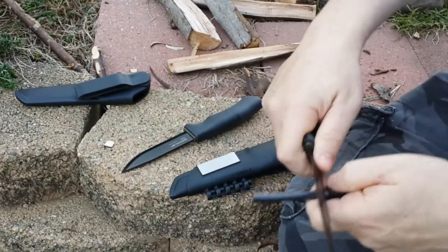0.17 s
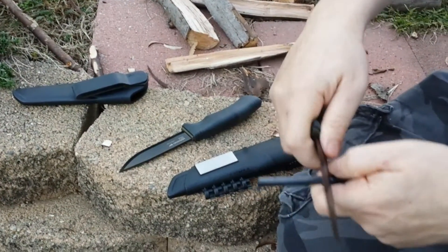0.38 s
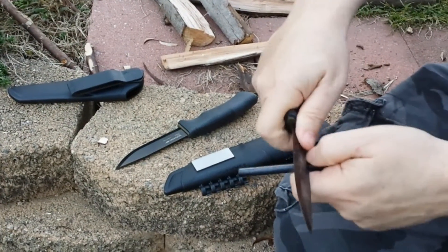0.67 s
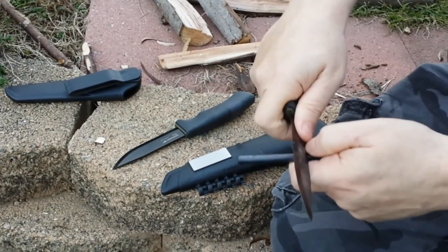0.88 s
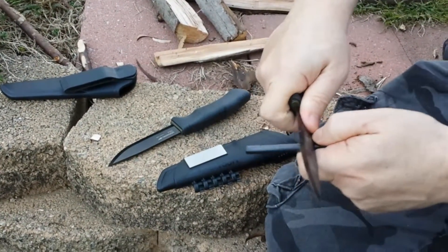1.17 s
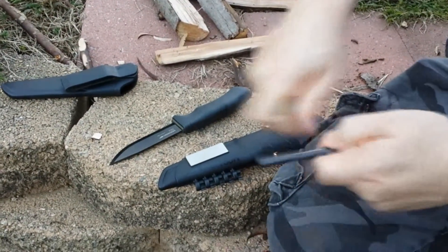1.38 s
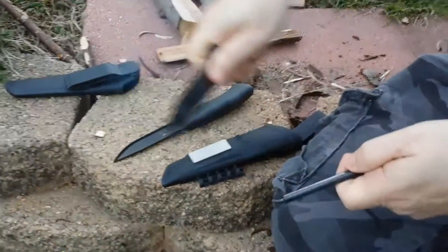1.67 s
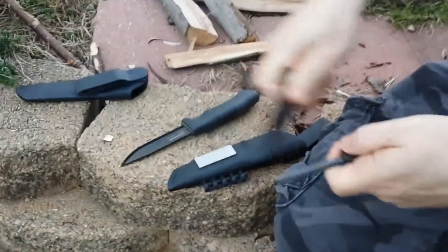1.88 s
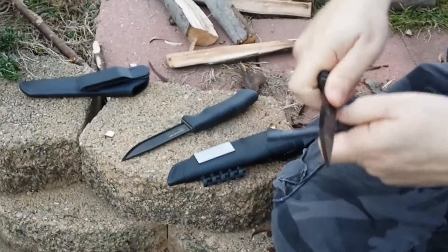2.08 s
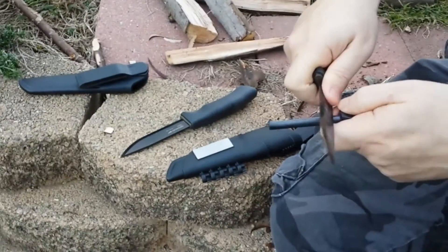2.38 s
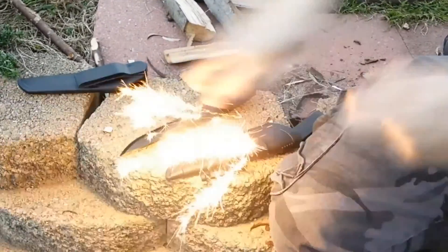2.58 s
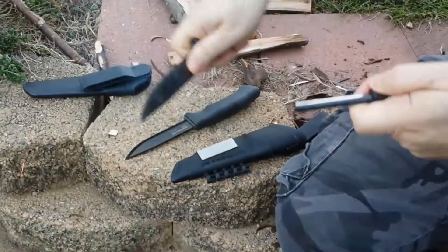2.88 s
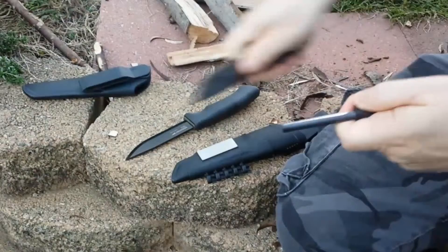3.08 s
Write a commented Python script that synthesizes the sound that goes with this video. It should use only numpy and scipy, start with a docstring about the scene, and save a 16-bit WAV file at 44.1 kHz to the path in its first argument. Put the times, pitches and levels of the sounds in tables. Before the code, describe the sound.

Close outdoors, soft handling creaks and a dull knock, then a harsh rod scrape with a sizzling shower of sparks, small knocks and pops, and a second scrape; crickets, insect buzz, thin bird notes, distant traffic.

```python
"""Outdoors, close to a stereo camera: a knife spine is driven twice along a fire steel.
Stick-slip clicks ring blade and rod as a rasp, with short squeals, and the spine snaps off the tip.
Random clicks make the shower of burning shavings, which dies in single pops made of filtered noise.
Grip creaks (noise bursts) and soft knocks (decaying sines) come in between, over sine-tone crickets,
a katydid buzz of dense clicks, thin bird notes, distant traffic and hiss of coloured noise."""
import sys
import numpy as np
from scipy import signal
from scipy.fft import rfft, irfft
from scipy.io import wavfile
from scipy.ndimage import uniform_filter1d

SR = 44100
rng = np.random.default_rng(int(sys.argv[2]) if len(sys.argv) > 2 else 0)


def store_wav(level_fs):
    """Save 16-bit WAV to argv[1]."""
    pcm = np.round(np.clip(np.atleast_2d(level_fs), -1, 1) * 32767)
    wavfile.write(sys.argv[1], SR, pcm.T.astype(np.int16))


def makeup_ratio(level_db):
    """Linear amplitude ratio for a level in decibels (20 dB per factor of ten)."""
    decades = np.asarray(level_db, float) / 20
    return 10 ** decades


N = 143325
T = np.arange(N) / SR


def level(x, db):
    """Scale to an rms level."""
    return x * makeup_ratio(db) / np.sqrt(np.mean(x ** 2))


def colour(x, table):
    """Causal minimum-phase filter with the gain of a (frequency [Hz], level [dB]) table."""
    size = 4096
    hz, db = np.array(table, float).T
    bins_hz = np.maximum(np.arange(size // 2 + 1) * SR / size, 1)
    log_gain = np.interp(np.log(bins_hz), np.log(hz), db) * np.log(10) / 20
    cepstrum = irfft(log_gain)
    # fold the cepstrum forward in time, which makes the filter causal
    cepstrum[1:size // 2] *= 2
    cepstrum[size // 2 + 1:] = 0
    impulse = irfft(np.exp(rfft(cepstrum)))
    if x.ndim > 1:
        impulse = np.atleast_2d(impulse)
    return signal.fftconvolve(x, impulse, axes=-1)[..., :N]


def ring(x, hz, width_hz):
    """One resonance."""
    return signal.lfilter(*signal.iirpeak(min(hz, .45 * SR), hz / width_hz, SR), x)


def walk(rate):
    """Smooth random wander with spread 1, drawing a new value rate times a second."""
    hold = max(int(SR / rate), 2)
    steps = np.repeat(rng.standard_normal(N // hold + 1), hold)
    wander = uniform_filter1d(steps, hold)[:N]
    return wander / wander.std()


def grains(rate, spread_db):
    """Random clicks, many small and a few large; rms 1."""
    chance, sign, size = rng.random((3, N))
    clicks = (chance < rate / SR) * np.sign(sign - .5) * makeup_ratio(-spread_db * np.log(size + .003))
    return level(clicks, 0)


def curve(rows, db):
    """Gain over the times of a table, silent outside it."""
    return makeup_ratio(np.interp(T, np.array(rows)[:, 0], db, left=-200, right=-200))


def bump(t0, length):
    """Rounded swell."""
    return np.sin(np.pi * np.clip((T - t0) / length, 0, 1)) ** .35


def ports(x, lag_s):
    """Two spaced ports: a lag, and each its own short treble scatter off stone and hands."""
    echo_db, echo_t60_s, echo_from_hz = -2, .012, 1300
    n = int(.04 * SR)
    tail = rng.standard_normal((2, n)) * np.exp(-np.log(1000) * np.arange(n) / SR / echo_t60_s)
    tail = signal.lfilter(*signal.butter(2, echo_from_hz, "high", fs=SR), tail)
    tail *= makeup_ratio(echo_db) / np.sqrt((tail ** 2).sum(axis=1, keepdims=True))
    tail[:, 0] = 1  # direct sound
    left = np.roll(x, int(round(lag_s * SR)))
    return signal.fftconvolve(np.array([left, x]), tail, axes=1)[:, :N]


def blip(t0, db, hz, width_hz, length_s):
    """A noise burst fading 20 dB over its length, twice through one resonance; start index and wave."""
    u = np.arange(1200) / SR
    push = rng.standard_normal(len(u)) * np.exp(-2.3 * u / max(length_s, .0003))
    y = ring(ring(push, hz, width_hz), hz, width_hz)
    loudest_power = np.max(uniform_filter1d(y ** 2, size=30))
    return int(t0 * SR), y * makeup_ratio(db) / np.sqrt(2 * loudest_power)


def add(track, i, y):
    """Mix a wave into a track."""
    track[..., i:i + y.shape[-1]] += y[..., :N - i]


# background hiss colour, its top cut away steeply: (frequency [Hz], level [dB])
HISS_COLOUR = [(100, -0.5), (700, 0.5), (2000, -2), (3200, -2), (6000, 1.5), (10000, -5), (12000, -5.5),
               (14000, -25.5), (15500, -50)]


def background_hiss():
    """Independent coloured noise in each channel."""
    return level(colour(rng.standard_normal((2, N)), HISS_COLOUR), -67.5)


# distant traffic spectrum: (frequency [Hz], level [dB])
TRAFFIC_COLOUR = [(12, -68.5), (20, -28.5), (32, -15.5), (47, -6.5), (97, -0.5), (125, -5.5), (208, -11),
                  (330, -18), (900, -35), (1170, -53), (1980, -120)]


def traffic():
    """Low rumble of distant traffic: a shared noise plus a side noise in opposite polarity."""
    mid, side = colour(rng.standard_normal((2, N)), TRAFFIC_COLOUR)
    side = colour(side, [(50, -16.5), (150, -16.5), (300, -7), (800, -5.5)])
    rumble = mid + side * np.array([[1], [-1]])
    balance_db = np.array([[.6], [-.6]])  # left, right
    return level(rumble * makeup_ratio(0.8 * walk(3.75) + balance_db), -60.5)


# cricket chorus spectrum: (frequency [Hz], level per Hz [dB])
CHORUS_COLOUR = [(3300, -35.5), (3650, -3.5), (3950, 2.5), (4300, -3.5), (4800, -6.5), (5150, -19)]
# near crickets: (start [s], length [s], frequency [Hz], pulse rate [1/s], level [dB])
CHIRPS = [(-.05, .48, 4260, 38, -67.5), (.59, .33, 4470, 26, -64.5), (1.76, .45, 3950, 30, -67),
          (2.95, .35, 4250, 35, -69.5)]


def crickets():
    """A flickering noise-band chorus and a few nearer sine chirps with pulsing level."""
    chorus_db, lag_turns = -64.5, .2
    chorus = level(colour(rng.standard_normal((2, N)), CHORUS_COLOUR), chorus_db)
    out = chorus * makeup_ratio(0.5 * walk(1.1) + 1.1 * walk(38))
    for t0, s, hz, rate, db in CHIRPS:
        beat = .75 + .25 * np.sin(2 * np.pi * rate * T)
        gain = makeup_ratio(db + 1.5 * walk(25))
        turns = np.cumsum(hz + 9 * walk(60)) / SR + np.array([[0], [lag_turns]])
        out += gain * np.sin(2 * np.pi * turns) * beat * bump(t0, s) ** 0.44
    return out


# creaks of the grip: (time [s], level before the common trim [dB], frequency [Hz])
CREAKS = [(0.2399, -54, 1750), (0.2574, -58, 1580), (0.275, -50, 1830), (0.2848, -51, 1760),
          (0.3132, -52, 1840), (0.3326, -50, 1840), (0.347, -48, 2090), (0.374, -49, 2270),
          (0.4013, -51, 2000), (0.4384, -47, 2240), (0.4677, -48, 2060), (0.498, -48, 2020),
          (0.5357, -52, 1900), (0.5636, -53, 1850), (0.6549, -49.5, 2140), (0.933, -47, 1600),
          (0.9765, -50.5, 1600), (1.0064, -44.5, 2380), (1.0184, -48.5, 1610), (1.0363, -48, 1860),
          (1.054, -46.5, 1940), (1.1099, -45, 1880), (1.6629, -38.5, 1690)]


def grip_creaks():
    """Short broad bursts as the grip creaks."""
    trim_db, relative_width, length_s = -9, .75, .003
    out = np.zeros(N)
    for t0, db, hz in CREAKS:
        add(out, *blip(t0, db + trim_db, hz, relative_width * hz, length_s))
    return out


# thin bird notes: (start [s], length [s], start frequency [Hz], end frequency [Hz], level [dB])
NOTES = [(0.458, .06, 7600, 7550, -72), (0.689, 0.024, 7450, 7700, -60), (1.57, 0.063, 7750, 7700, -56),
         (2.117, 0.047, 7370, 7250, -61), (3.0, .08, 7450, 7550, -68), (3.134, .05, 7400, 7320, -70.5)]


def bird_notes():
    """Gliding sine notes, unsteady in pitch and level, with a random phase in each channel."""
    out = np.zeros((2, N))
    for t0, s, hz, end_hz, db in NOTES:
        f = np.interp(T, [t0, t0 + s], [hz, end_hz]) + 40 * walk(76)
        turn = 2 * np.pi * (np.cumsum(f) / SR + rng.random((2, 1)))
        out += makeup_ratio(db + 4.2 * walk(68.9)) * np.sin(turn) * bump(t0, s)
    return out


# soft knocks of hand or handle: (time [s], level [dB], frequency [Hz], 60 dB decay [s], rise [s])
KNOCKS = [(0.6863, -36, 234, 0.075, 0.0044), (1.7045, -37.5, 366, 0.036, 0.0012),
          (1.7045, -41, 663, 0.022, 0.00051), (1.853, -34, 202, 0.015, 0.00068),
          (1.894, -44, 393, 0.0042, 0.0002), (2.44, -42.5, 830, 0.045, 0.0012)]


def knocks():
    """Decaying sines with a softened onset."""
    out = np.zeros(N)
    for t0, db, hz, t60, rise in KNOCKS:
        u = np.arange(int(t60 * SR)) / SR
        decay = np.exp(-np.log(1000) * u / t60)
        onset = 1 - np.exp(-(u / max(rise, 1e-4)) ** 2)
        add(out, int(t0 * SR), -makeup_ratio(db) * np.sin(2 * np.pi * hz * u) * decay * onset)
    return out


# late pops and small ticks: (time [s], level [dB], frequency [Hz], length [s], left minus right [dB])
POPS = [(0.933, -48.5, 6000, .002, -9), (1.112, -45, 6040, .006, 1), (1.510, -31.5, 9100, 0.0046, -14),
        (1.671, -38, 8300, .001, -12), (1.672, -28, 6200, 0.00089, -1.5), (1.697, -44.5, 6000, .003, 9),
        (2.076, -43, 6300, 0.0033, -0.5), (2.586, -32.5, 9000, .003, -14), (2.5935, -25.5, 6260, .001, -15),
        (2.598, -30, 6860, .002, -12.5), (2.656, -52.5, 7960, .002, -13), (2.689, -35.5, 6800, 0.011, 0),
        (2.696, -31.5, 8100, 0.0095, -11), (2.731, -45, 7900, .008, -8.5), (2.745, -45, 7000, .006, -9),
        (2.897, -54, 7540, 0.015, -7), (3.157, -53, 14030, 0.0018, -10)]


def single_pops():
    """Single bursts of resonant noise, drawn afresh for each channel and placed by level."""
    relative_width = 0.64
    out = np.zeros((2, N))
    for t0, db, hz, s, pan_db in POPS:
        for track, half in zip(out, (.5, -.5)):
            add(track, *blip(t0, db + pan_db * half, hz, relative_width * hz, s))
    return out


# katydid buzz: (start [s], length [s], level [dB])
BUZZES = [(1.035, 0.12, -56), (1.133, 0.13, -56.5), (1.505, 0.17, -53), (1.636, 0.15, -52),
          (1.755, 0.17, -59.5), (2.669, 0.11, -54), (2.759, .09, -63)]
# buzz spectrum: (frequency [Hz], level [dB])
BUZZ_COLOUR = [(3000, -14.5), (6700, -8), (7600, -2), (8400, -6.5), (9200, -4), (10500, -14.5),
               (16000, -23)]


def insect_buzz():
    """Dense clicks near 7.6 and 9 kHz, spikier in the left channel, swelling in repeated bursts."""
    buzz = np.array([grains(12000, 5.1), grains(12000, 2.3)])
    buzz = level(colour(buzz, BUZZ_COLOUR), 0)
    buzz = buzz * makeup_ratio(2.4 * walk(34))
    return buzz * sum(makeup_ratio(db) * bump(t0, s) ** 4 for t0, s, db in BUZZES)


STEEL_LAG_S = -.00026  # left minus right arrival
# broad colour of the scrape: (frequency [Hz], level [dB])
RASP_COLOUR = [(300, -30.5), (1500, -23), (2600, -6.5), (3200, -7), (4200, -4.5), (5300, 1), (7300, 1.5),
               (9300, -4), (14200, -14), (15400, -14.5), (16500, -42.5)]
# blade and rod resonances, one list a stroke, as the free length of rod differs:
# (frequency [Hz], width [Hz], level [dB])
STEEL_MODES = [
    [(2600, 430, 3), (4100, 360, -7.5), (5940, 660, 3), (6600, 980, -1.5), (9000, 653, 0)],
    [(2420, 600, -7), (3980, 1160, -4), (4826, 320, 0), (6350, 435, -16), (7450, 450, -4),
     (8770, 1700, -15)],
]


def steel_body(push, stroke, ring_db):
    """Blade and rod answer a push: a broad scrape plus resonances of alternating sign."""
    rung = 0
    for k, (hz, width_hz, db) in enumerate(STEEL_MODES[stroke]):
        rung = rung + (-1) ** k * makeup_ratio(db) * ring(push, hz, width_hz)
    return colour(push, RASP_COLOUR) + makeup_ratio(ring_db) * rung


# rasp of the spine on the rod, one list a stroke: (time [s], level before the common trim [dB])
RASP = [
    [(1.238, -59), (1.245, -46), (1.25, -50), (1.253, -31), (1.258, -40), (1.262, -28.5), (1.272, -35),
     (1.292, -37), (1.2985, -34), (1.307, -31), (1.314, -67)],
    [(2.398, -73), (2.408, -38), (2.423, -36), (2.429, -33.5), (2.443, -37.5), (2.452, -36.5), (2.464, -35),
     (2.471, -36.5), (2.48, -69)],
]


def rasp():
    """Stick-slip clicks along the rod, biting in clumps, ring blade and rod."""
    slips_per_s, slip_spread_db, ring_db, trim_db = 14000, 2.8, -13, 4
    chatter_db, chatter_per_s, contacts = 2.5, 250, 4
    out = np.zeros((2, N))
    for stroke, rows in enumerate(RASP):
        stroke_gain = curve(rows, np.array(rows)[:, 1])
        for _ in range(contacts):  # each point of contact scatters its own way
            slips = grains(slips_per_s / contacts, slip_spread_db)
            slips = slips * makeup_ratio(chatter_db * walk(chatter_per_s))
            scrape = level(steel_body(slips, stroke, ring_db), trim_db) * stroke_gain
            out += ports(scrape, STEEL_LAG_S) / np.sqrt(contacts)
    return out


# the spine digs in and the rod squeals briefly: (time [s], level [dB], frequency [Hz])
BITES = [(1.2512, -29.5, 4100), (1.2605, -22, 4110), (2.4266, -28.5, 5150)]


def bites():
    """The hardest bites squeal as narrow resonant bursts."""
    filter_width_hz, length_s = 400, 0.0085
    out = np.zeros(N)
    for t0, db, hz in BITES:
        add(out, *blip(t0, db, hz, filter_width_hz, length_s))
    return ports(out, STEEL_LAG_S)


# slips as the spine leaves the tip, one list a stroke: (time [s], peak level [dB])
SNAPS = [
    [(1.3012, -5.5), (1.3026, -6.5), (1.3046, -4.5)],
    [(2.4535, -15.5), (2.457, -5), (2.4578, -6), (2.4586, -3), (2.4604, -10)],
]


def tip_snaps():
    """Sharp impulses as the spine slips off the tip ring blade and rod."""
    ring_db = 13.5
    out = np.zeros((2, N))
    for stroke, snaps in enumerate(SNAPS):
        tip = np.zeros(N)
        for t0, db in snaps:
            impulse = np.zeros(N)
            add(impulse, int(t0 * SR), np.array([1., .3, -.2]))
            snap = steel_body(impulse, stroke, ring_db)
            tip = tip + snap * makeup_ratio(db) / np.abs(snap).max()
        out += ports(tip, STEEL_LAG_S)
    return out


# burning shavings, one list a stroke: (time [s], level [dB], low flare relative to it [dB])
SHOWER = [
    [(1.304, -34, -16), (1.312, -22, -17), (1.329, -25, -10), (1.346, -23.5, -14.5), (1.368, -25, -12.5),
     (1.391, -30, -16.5), (1.421, -36.5, -11), (1.447, -35.5, -15), (1.453, -46, -16), (1.472, -36, -11.5),
     (1.485, -44.5, -7), (1.492, -51, -18), (1.525, -47.5, -16), (1.56, -73, -22)],
    [(2.466, -41, -21.5), (2.479, -29, -9), (2.482, -22, -18), (2.5, -18, -17), (2.514, -19, -15.5),
     (2.54, -29, -15.5), (2.566, -34, -17), (2.59, -36.5, -15), (2.62, -44, -13.5), (2.628, -49.5, -11),
     (2.66, -52.5, -11.5), (2.685, -59, -15)],
]
# crackle and flare spectra: (frequency [Hz], level [dB])
SPARK_COLOUR = [(1200, -31), (2050, -26), (2750, -18), (3800, -14.5), (4500, -11.5), (5600, -9),
                (7400, -8.5), (8800, -7), (10400, -11.5), (14800, -13.5), (15500, -14.5), (15900, -74.5)]
FLARE_COLOUR = [(35, -16.5), (60, -3.5), (155, -3), (400, -5.5), (590, -9.5), (780, -2), (1100, -8),
                (1550, -5.5), (2050, -7.5), (2600, -4.5), (3400, -25), (5700, -81.5)]
# brightest band of each shower: (frequency [Hz], width [Hz], level [dB])
SPARK_PEAK = [(6200, 3900, -1), (6740, 2000, 0.5)]
# spots across the stone: left minus right arrival [s]
SPOT_LAG_S = [-0.0054, -.0005, -0.0042, -.0001, .0001, .0004, 0.0046, .0009]


def sparks():
    """Shavings crackle at several spots while a low flare rushes up from the middle."""
    sparks_per_s, spark_spread_db = 17000, 3.3
    sputter_db, sputter_per_s = 2.8, 150
    flare_spread, flare_flicker_db = .12, 1.6  # the flare sits nearer the middle than the sparks
    crackle, flare = np.zeros((2, N)), np.zeros((2, N))
    for lag in SPOT_LAG_S:  # each spot's crackle sputters on its own
        spot = grains(sparks_per_s / len(SPOT_LAG_S), spark_spread_db)
        crackle += ports(spot * makeup_ratio(sputter_db * walk(sputter_per_s)), lag)
        flare += ports(grains(2500, 1.5), flare_spread * lag)
    crackle = level(colour(crackle, SPARK_COLOUR), -0.67)
    flare = flare * makeup_ratio(flare_flicker_db * walk(120))  # the flare flickers as one
    flare = level(colour(flare, FLARE_COLOUR), 0.88)
    out = np.zeros((2, N))
    for rows, (hz, width_hz, peak_db) in zip(SHOWER, SPARK_PEAK):
        _, db, flare_db = np.array(rows).T
        bright = crackle + makeup_ratio(peak_db) * ring(crackle, hz, width_hz)
        out += bright * curve(rows, db) + flare * curve(rows, db + flare_db)
    return out


# broad low part of the pops and ticks: (time [s], level [dB], frequency [Hz], length [s])
POP_LOWS = [(1.461, -48, 1050, 0.023), (1.51, -45.5, 1490, 0.0057), (1.7082, -43, 1900, 0.0027),
            (2.077, -45, 2020, 0.00076), (2.591, -47, 1400, 0.0027), (2.592, -42.5, 1500, 0.0027),
            (2.614, -43.5, 1500, .004), (2.688, -44, 1210, 0.0069), (2.697, -42, 1150, 0.013)]


def pop_lows():
    """The broad low part of pops and ticks: short noise bursts through a very broad resonance."""
    relative_width = 1.54
    out = np.zeros(N)
    for t0, db, hz, s in POP_LOWS:
        add(out, *blip(t0, db, hz, relative_width * hz, s))
    return out


# camera body in front of the left port: (frequency [Hz], level [dB])
LEFT_SHADE = [(100, 0.5), (1300, 2), (2500, -2.5), (5000, 0), (8000, -6), (11000, -13), (16000, -30.5)]


def shade_left(x):
    """The camera body dulls what reaches the left port."""
    return np.array([colour(x[0], LEFT_SHADE), x[1]])


def scene():
    """Steel, sparks, hands and buzz are duller on the left; the rest is added unshaded."""
    centre = ports(grip_creaks() + knocks() + pop_lows(), 0)
    steel = rasp() + bites() + tip_snaps()
    shaded = shade_left(centre + insect_buzz() + steel + sparks())
    return shaded + single_pops() + traffic() + crickets() + bird_notes()


def top_cut(x):
    """Nothing passes above the cut-off."""
    return signal.sosfilt(signal.butter(12, 16800, fs=SR, output="sos"), x)


def record(dry):
    """Background hiss joins the scene and a soft limit keeps the hardest peaks below full scale."""
    mix = 0.89 * np.tanh((dry + background_hiss()) / 0.81)
    return top_cut(mix)


dry = scene()
out = record(dry)
store_wav(out)
```